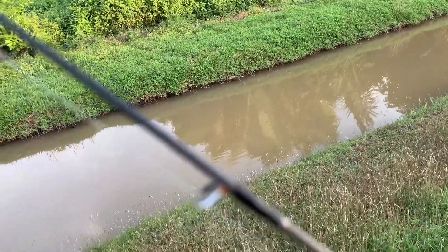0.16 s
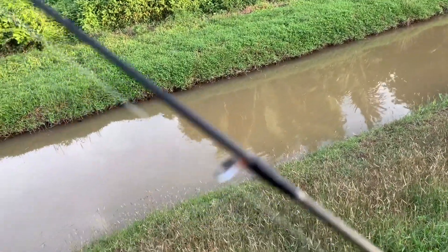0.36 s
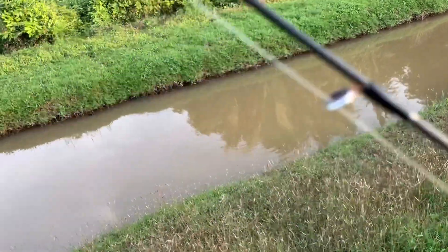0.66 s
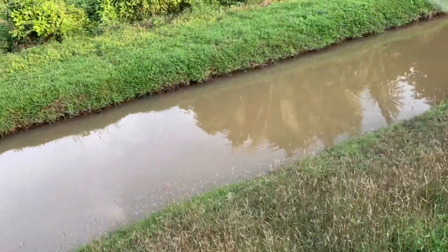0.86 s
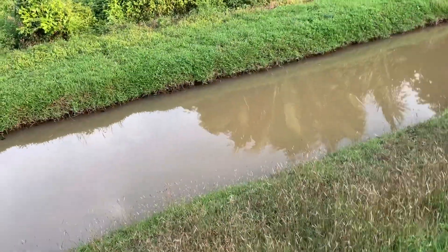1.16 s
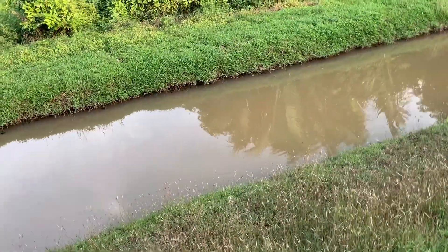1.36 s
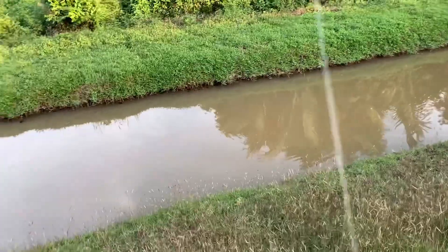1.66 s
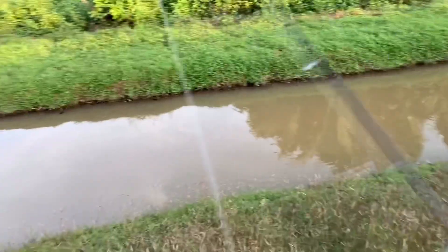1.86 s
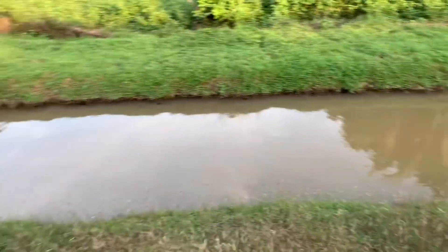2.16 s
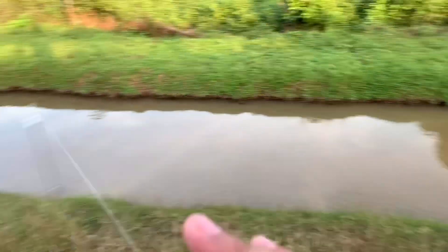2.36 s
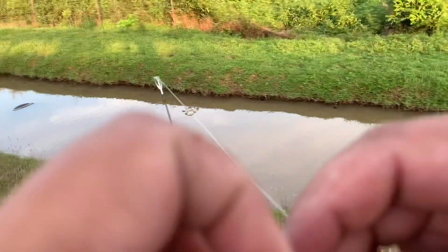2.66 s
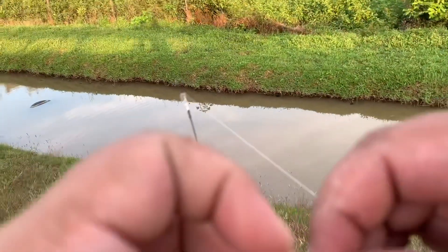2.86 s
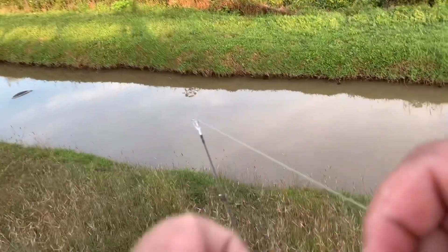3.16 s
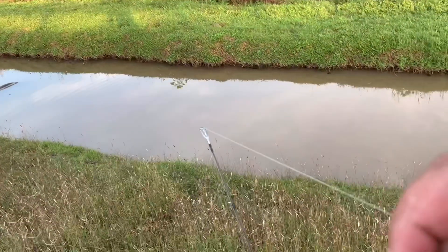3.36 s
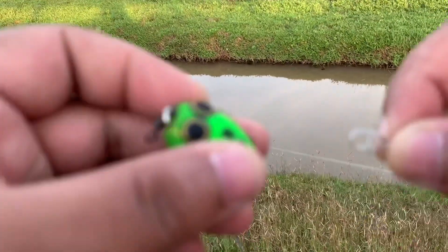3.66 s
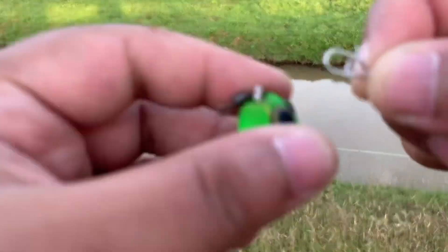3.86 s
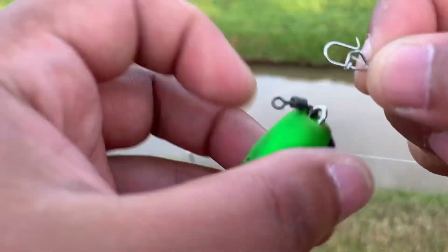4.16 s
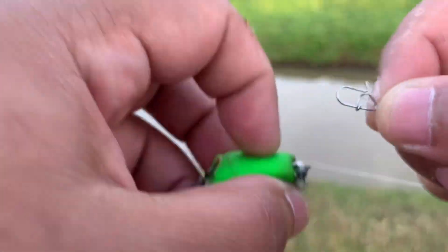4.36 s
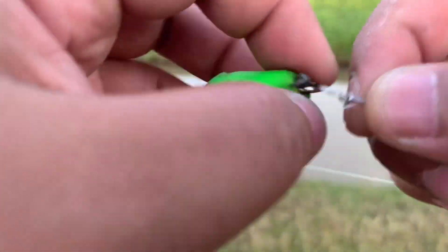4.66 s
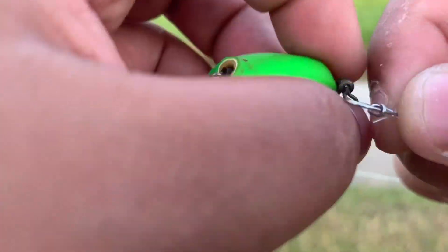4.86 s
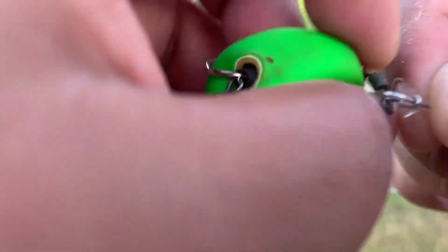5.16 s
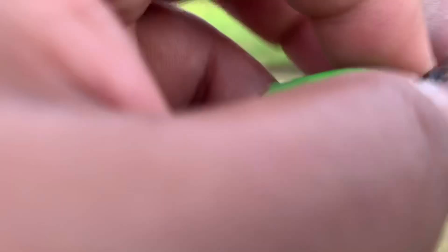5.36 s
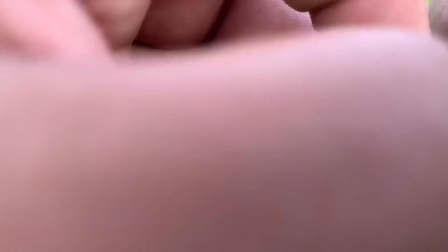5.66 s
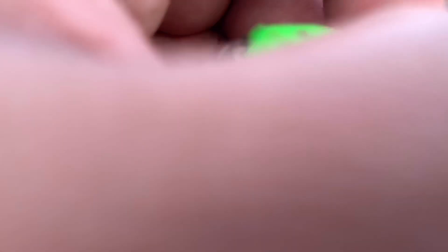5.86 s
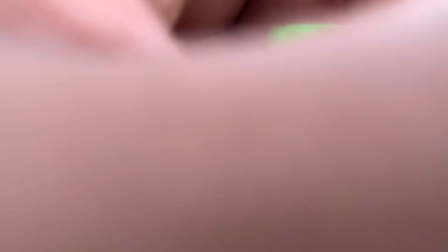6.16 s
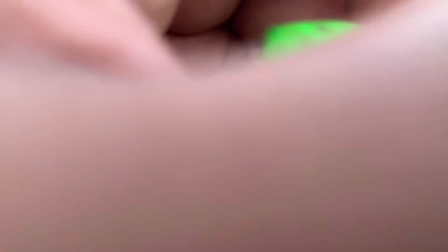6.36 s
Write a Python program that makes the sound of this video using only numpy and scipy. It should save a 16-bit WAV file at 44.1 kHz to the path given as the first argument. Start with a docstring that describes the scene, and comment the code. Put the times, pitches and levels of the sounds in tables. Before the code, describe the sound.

Open grassy canal bank beside a busy highway. Deep, continuous traffic rumble, with lorry engine drones swelling and sinking in pitch and tyre roar from both sides. Early on a tiny insect buzzes thinly, close by, for under a second. Near the middle comes one short, dead knock on a hollow plastic lure. Soft rustle and insect hiss stay underneath. Stereo outdoor pickup, no echo.

```python
"""A grassy canal bank near a highway: lorries pass, each engine note sinking as it goes by, as sums of sine tones.
Tyre roar from both directions of the road, rumble and growl are coloured noise that swells and fades.
Hands knock a plastic lure, one insect buzzes briefly, and insects hiss in the grass.
Two spaced microphones hear a source a little earlier on its own side; sound from all around differs in each."""
import sys
import numpy as np
from scipy import signal
from scipy.fft import rfft, irfft, next_fast_len
from scipy.io import wavfile
from scipy.ndimage import uniform_filter1d, map_coordinates

SR = 44100
rng = np.random.default_rng(int(sys.argv[2]) if len(sys.argv) > 2 else 0)


def wav_record(signal):
    """Record a signal, one row per channel, as 16-bit PCM in the file named by sys.argv[1]."""
    frames = np.transpose(np.atleast_2d(signal))
    bounded = np.clip(frames, -1, 1)
    # unit amplitude maps onto the largest positive 16-bit level
    quanta = np.round(bounded * 32767).astype(np.int16)
    wavfile.write(sys.argv[1], SR, quanta)


N = 286650
T = np.arange(N) / SR  # time of each sample, seconds
SOUND_M_S = 343  # speed of sound

# Noise colours below all have the columns [f/Hz, level per Hz/dB]; only their shape counts.

# passing lorries: [nearest t/s, firing rate/Hz, speed/(m/s), nearest distance/m,
# change of the rate/(Hz/s), left microphone later by/ms]
LORRIES = [(-0.11, 78.31, 34, 43.3, .71, 0.42), (1.95, 101.3, 32, 19, 0.3956, 0.4),
           (2.46, 57.98, 26.5, 15.94, 0.013, 0.21), (3.828, 58.07, 36, 27, 0.0084, 0.34),
           (4.16, 52.57, 24, 11.14, 0.027, 0.42), (6.199, 51.81, 18, 11, 0.007, 0.29),
           (0.3, 114.5, 12.4, 6.7, 0.01, 0.3)]
# swells of the engine tones: for each lorry, for each multiple of its firing rate from the first up,
# a list of [peak t/s, peak level/dB, width/s]
ENGINE_SWELLS = [
    [[(.25, -16.5, 0.73), (2.66, -28, 0.65), (3.5, -28, .3), (4.8, -26.5, 0.29), (6.3, -31, 0.2)],
     [(.2, -26, 0.21), (1.31, -22, 1.13), (4.0, -26.5, 1.4), (5.8, -28.5, 0.22)]],
    [[(.9, -21, 0.08), (1.47, -8.5, 0.45), (2.98, -19, 0.49), (3.79, -21, 0.11), (4.6, -24.5, 0.53),
     (5.8, -28, 0.56)], [(.85, -29.5, 0.073), (1.25, -27, 0.28), (2.87, -20.5, 0.33), (3.58, -20.5, 0.29),
     (4.54, -23.5, 0.87)], [(1.76, -28.5, 0.2), (3.65, -31.5, 0.54)], [(1.8, -40, 0.19), (3.3, -37.5, 0.21),
     (4.05, -37, 0.19)], [(3.7, -41.5, 0.32)]],
    [[(1.34, -26, .16), (2.64, -20.5, 0.43), (4.3, -25.5, 0.44)], [(1.4, -27, 0.85), (2.41, -15.5, 0.4)],
     [(2.28, -30, 0.31), (3.02, -27, 0.26)], [], [], [(2.35, -38, 0.063)], [], [], [(2.25, -39, 0.068)]],
    [[(3.75, -26, 0.22)], [(2.9, -22.5, 0.48), (3.55, -20.5, 0.22)], [], [], [], [], [],
     [(3.15, -41.5, 0.2)], [], [(2.7, -40, .07), (3.05, -41, .07)]],
    [[(3.79, -27.5, .57)], [(3.66, -17.5, 0.32), (4.55, -16, 0.3), (5.35, -19.5, 0.25), (6.2, -19, 0.33)],
     [(3.75, -25, 0.2), (4.6, -28, 0.28)], [(4.95, -28.5, 0.39)]],
    [[(5.8, -25, 0.45)], [(5.7, -16, 0.46), (6.4, -15.5, 0.28)], [(4.9, -25.5, 0.37), (5.75, -26, 0.2),
     (6.35, -24.5, 0.24)], [(5.54, -28.5, 0.22), (6.44, -31.5, 0.25)], [(5.95, -37, 0.24),
     (6.42, -27, 0.13)], [(5.95, -30.5, 0.1), (6.35, -26.5, 0.18)], [(5.9, -39, .15), (6.38, -30.5, 0.14)],
     [(5.7, -37, 0.09), (6.2, -31, 0.18)], [(5.95, -39.5, 0.12)], [(5.99, -44, 0.097)]],
    [[(.15, -20, 0.31)]],
]

# tyre sound along the road: [t/s, roar from right level/dB, roar from left level/dB,
# hiss from right level/dB, hiss from left level/dB]
ROAD_LEVELS = [(0.0, -25.5, -31, -37, -60), (0.65, -27, -37, -36.5, -55), (1.3, -32, -30, -37.5, -41),
               (1.95, -30, -30.5, -38.5, -44.5), (2.3, -32, -30, -41, -37), (2.85, -30, -34, -40.5, -38.5),
               (3.3, -31.5, -29, -38.5, -39.5), (3.9, -32, -30.5, -42, -40.5), (4.4, -37, -29, -46, -42),
               (4.9, -31.5, -30, -51, -41.5), (5.1, -26.5, -26.5, -44.5, -41),
               (5.85, -35.5, -25.5, -39, -43), (6.5, -27.5, -27, -42, -38)]
# colour of lorry bodies and tyres, from the right: [f/Hz, level per Hz/dB]
ROAR_RIGHT_COLOUR = [(200, -2.5), (350, -6.5), (550, -3.5), (800, 0), (1050, 3), (1350, -9), (1700, -22),
                     (2400, -25.5)]
# the same from the left: [f/Hz, level per Hz/dB]
ROAR_LEFT_COLOUR = [(200, -3), (350, -1.5), (520, -2), (800, -5.5), (1150, 0), (1500, -12.5), (2200, -33.5)]
# colour of tread on asphalt, from the right: [f/Hz, level per Hz/dB]
HISS_RIGHT_COLOUR = [(800, -6), (1300, -4), (1700, -2), (2300, -6), (3100, -9.5), (3800, -12), (5000, -21),
                     (7500, -33.5), (11000, -55)]
# the same from the left: [f/Hz, level per Hz/dB]
HISS_LEFT_COLOUR = [(800, -22), (1300, 0), (1800, -1.5), (2400, -10.5), (3000, -9.5), (3800, -16),
                    (5500, -23.5), (9000, -35)]
# brighter tyre wash of nearer cars, from the left: [peak t/s, peak level/dB before panning, width/s]
WASH_SWELLS = [(2.38, -52, 0.092), (2.8, -52, 0.17), (3.33, -44.5, 0.19), (5.75, -49, .35)]
# colour of the wash: [f/Hz, level per Hz/dB]
WASH_COLOUR = [(1400, -22), (2000, -1), (2800, 1), (3500, -6), (4300, -22)]
# colour of the far rumble: [f/Hz, level per Hz/dB]
RUMBLE_COLOUR = [(25, -32), (40, -33), (60, 4.5), (110, -3), (200, -7.5), (300, -15.5), (450, -27),
                 (700, -57), (1200, -54)]
# many far engines blended into a growl: [t/s, level/dB]
GROWL_LEVELS = [(0, -39), (.6, -39.5), (1.2, -34), (1.8, -43), (2.4, -32.5), (2.9, -32), (3.5, -35.5),
                (4.1, -38), (4.7, -40.5), (5.2, -36), (5.7, -34.5), (6.1, -29.5), (6.5, -31.5)]
# colour of the growl: [f/Hz, level per Hz/dB]
GROWL_COLOUR = [(180, -14), (250, 3.5), (350, -1), (480, -2.5), (650, -17), (850, -38)]

# blow and bounce on the plastic lure: [t/s, gain/dB]
KNOCKS = [(2.8985, -6.5), (2.9043, -19)]
# wire clip touches: [t/s, starting gain/dB]
TICKS = [(0.9124, -30), (1.004, -34), (3.4785, -29), (6.2153, -39)]

# one near insect: [t/s, upper band level/dB, lower band level/dB], before a lift of 3 dB
BUZZ_LEVELS = [(0.36, -70, -66), (0.385, -47, -55), (0.474, -52, -55), (0.522, -43, -48), (0.54, -53, -63),
               (0.6, -47, -41), (0.606, -42, -50), (0.71, -46, -44), (0.91, -44, -45), (0.948, -44, -38),
               (1.002, -50, -54), (1.04, -78, -77)]
# its upper resonances: [f/Hz, width/Hz, level/dB], levels relative to each other
WING_MODES = [(12200, 600, -14), (12700, 760, -8), (13200, 670, -8), (13750, 700, -14)]
# its lower resonances: [f/Hz, width/Hz, level/dB], levels relative to each other
BELLY_MODES = [(10500, 680, -10), (10900, 520, 0), (11500, 460, -4)]

# the grass: [t/s, rustle level/dB, crickets level/dB, high hiss level/dB]
GRASS_LEVELS = [(0.0, -50.5, -54.5, -58), (0.65, -47, -53, -53), (1.3, -53, -55.5, -58.5),
                (1.95, -48.5, -56.5, -55), (2.3, -44.5, -61, -51), (3.0, -48, -52, -50),
                (3.6, -44, -49.5, -49), (4.4, -45.5, -48.5, -52.5), (5.2, -47, -52, -55.5),
                (5.85, -47.5, -52, -56), (6.5, -47.5, -51, -55.5)]
# brief louder rustles: [t/s, rise/dB]
STIRS = [(3.21, 6.5), (3.4, 2), (4.02, 4)]
# colour of the rustle: [f/Hz, level per Hz/dB]
RUSTLE_COLOUR = [(2500, -49), (3800, 2), (5000, 4), (7000, 0.5), (9500, -3.5), (11000, -27), (13000, -69)]
# colour of the cricket band: [f/Hz, level per Hz/dB]
CRICKET_COLOUR = [(7400, -41), (8000, 8), (8600, 1), (9500, 2.5), (10500, -51)]
# colour of the high hiss: [f/Hz, level per Hz/dB]
CHORUS_COLOUR = [(8500, -36), (9800, -1), (11000, 0), (12500, -4.5), (13600, -7), (14250, -8), (14700, -30),
                 (15700, -35)]

# how the two microphones differ: [f/Hz, left over right level/dB, left later by/ms]
MICROPHONE_PAIR = [(60, 0.5, .2), (80, 0, .15), (105, -2, -0.1), (150, 0.5, -0.15), (400, -0.5, -0.061),
                   (970, -1.9, 0.02), (1800, .5, -0.0015), (4000, -0.1, 0.0042), (9000, -0.5, -0.00059)]


def amp(db):
    """Gain of a level in dB."""
    return 10 ** (np.asarray(db) / 20)


def unit(x):
    """x scaled to an average strength (rms) of 1."""
    return x / np.sqrt(np.mean(x ** 2) + 1e-20)


def curves(rows):
    """One value per sample for each column after the time."""
    times, *columns = np.transpose(rows)
    return [np.interp(T, times, column) for column in columns]


def bump(peak_s, width_s):
    """A smooth bell-shaped rise to 1 and fall."""
    return np.exp(-.5 * ((T - peak_s) / width_s) ** 2)


def swelling(rows):
    """Sum of bell-shaped swells, each with its own time, level and width."""
    return sum(amp(db) * bump(peak_s, width_s) for peak_s, db, width_s in rows)


def wobble(rate):
    """A smooth random curve, with rate random knots a second."""
    coarse = T[::64]
    knots = rng.standard_normal(int(N * rate / SR) + 4)
    return np.interp(T, coarse, map_coordinates(knots, [coarse * rate]))


def filtered(x, response):
    """x passed through a filter given as a complex response of frequency."""
    size = next_fast_len(N + 8192)
    return irfft(rfft(x, size) * response(np.fft.rfftfreq(size, 1 / SR)), size)[..., :N]


def spaced(x, lag_ms):
    """Left and right microphones, the left one lag_ms later: half the delay goes to each side."""
    sides = np.array([[1], [-1]])
    return filtered(x, lambda hz: np.exp(-1j * np.pi * hz * sides * lag_ms / 1000))


def panned(x, db):
    """Right side raised and left side lowered by db."""
    return x * amp([[-db], [db]])


def noise(colour, patchy_db, size=(7, 4)):
    """Coloured noise of rms 1 with patches of random gain, size in 21 Hz by 23 ms cells."""
    hz, _, cells = signal.stft(rng.standard_normal(N), SR, nperseg=2048)
    patches = uniform_filter1d(rng.standard_normal(cells.shape), size[0], 0)
    patches = uniform_filter1d(patches, size[1], 1)
    f, db = np.transpose(colour)
    colour_db = np.interp(np.log(hz + 1), np.log(f), db, -120, -120)
    gain = amp(colour_db[:, None] + patchy_db * unit(patches))
    return unit(signal.istft(cells * gain, nperseg=2048)[1][:N])


def around(colour, patchy_db):
    """Noise from all sides: unrelated at the two microphones."""
    return np.array([noise(colour, patchy_db), noise(colour, patchy_db)])


def engine(lorry, swells):
    """Multiples of the firing rate, raised on approach and lowered on leaving; moving air makes each waver."""
    near_s, rate_hz, speed, distance, change, lag_ms = lorry
    since = T - near_s
    leaving_m_s = speed * speed * since / np.hypot(distance, speed * since)
    heard_hz = rate_hz * (1 - leaving_m_s / SOUND_M_S) + change * since
    turn = 2 * np.pi * np.cumsum(heard_hz) / SR
    tones = np.zeros(N)
    for k, rows in enumerate(swells):
        if rows:
            waver = amp((1.1 + 0.32 * k) * wobble(7.2))  # higher tones waver more
            tones += swelling(rows) * waver * np.sin((k + 1) * (turn + 0.09 * wobble(9)))
    return spaced(np.sqrt(2) * tones, lag_ms)  # so that levels are rms


def tyres():
    """Low roar and brighter hiss from up and down the road, so early on one side or on the other."""
    roar_right_db, roar_left_db, hiss_right_db, hiss_left_db = curves(ROAD_LEVELS)
    roar_right = amp(roar_right_db) * noise(ROAR_RIGHT_COLOUR, patchy_db=3.0)
    hiss_right = amp(hiss_right_db) * noise(HISS_RIGHT_COLOUR, patchy_db=3.0)
    right = spaced(roar_right, 0.45) + spaced(hiss_right, 0.36)
    roar_left = amp(roar_left_db) * noise(ROAR_LEFT_COLOUR, patchy_db=3.0)
    hiss_left = amp(hiss_left_db) * noise(HISS_LEFT_COLOUR, patchy_db=2.0)
    left = spaced(roar_left + hiss_left, -0.49)
    return panned(right, .6) + panned(left, -.6)


def wash():
    """Brighter tyre noise of nearer cars, swelling and fading on the left."""
    return panned(spaced(swelling(WASH_SWELLS) * noise(WASH_COLOUR, patchy_db=3.5), -0.38), -1.5)


def rumble():
    """Deep far rumble: mostly from one direction, partly from all around, with a wavering level."""
    level = amp(-19 + 0.85 * wobble(3.12))
    directed = spaced(noise(RUMBLE_COLOUR, patchy_db=1.0), 0.57)
    return level * (directed + 0.32 * around(RUMBLE_COLOUR, patchy_db=3.0))


def growl():
    """Many far engines blend into noise with narrow, lasting patches."""
    blend = noise(GROWL_COLOUR, patchy_db=5.0, size=(1, 12))
    return spaced(amp(curves(GROWL_LEVELS)[0]) * blend, 0.12)


def scattered():
    """Steady road noise thrown back from ground and bushes, so it arrives from all around."""
    hiss = amp(-42) * around(HISS_RIGHT_COLOUR, patchy_db=3.5)
    roar = amp(-35.5) * around(ROAR_RIGHT_COLOUR, patchy_db=3.0)
    return hiss + roar


def knock():
    """A dead knock on hollow plastic: a short push and a quickly dying low body tone."""
    x, t = np.zeros(N + SR), np.arange(SR // 20) / SR
    push = .6 * np.exp(-.5 * ((t - .00175) / .00058) ** 2) * np.sin(2 * np.pi * 1000 * t)
    body_hz, body_db, decay_s = 520, -15, .0035
    body = amp(body_db) * np.exp(-t / decay_s) * np.sin(2 * np.pi * body_hz * t)
    for s, db in KNOCKS:
        x[round(s * SR):][:len(t)] -= amp(db) * (body + push)
    return spaced(x[:N], -.03)


def ticks():
    """Faint ticks of wire: bright noise that falls 60 dB in 4 ms."""
    x, t = np.zeros(N + SR), np.arange(SR // 20) / SR
    for s, db in TICKS:
        bright = np.diff(rng.standard_normal(len(t) + 2), 2) / 6  # differences favour the treble
        x[round(s * SR):][:len(t)] += amp(db - 60 * t / .004) * bright
    return spaced(x[:N], -.03)


def resonance(centre_hz, width_hz):
    """Response of a double resonance, with a steep end to the treble above 14300 Hz."""
    def response(hz):
        peak = hz * width_hz / (centre_hz ** 2 - hz ** 2 + 1j * hz * width_hz)
        return peak ** 2 / (1 + (hz / 14300) ** 60)
    return response


def buzz():
    """Uneven wing strokes, about 200 a second, chop a scraping noise that rings two groups of resonances."""
    stroke_count = np.floor(np.cumsum(200 * amp(2.0 * wobble(60))) / SR)
    strokes = np.diff(stroke_count, prepend=0) * amp(1.5 * rng.standard_normal(N))
    strength = filtered(strokes, lambda hz: 1 / (1 + 1j * hz / 55))  # each stroke dies away
    scrape = (0.24 * strength.mean() + strength) * rng.standard_normal(N)
    mixed = np.zeros(N)
    for level_db, modes in zip(curves(BUZZ_LEVELS), (WING_MODES, BELLY_MODES)):
        # each resonance flares on its own
        band = sum(amp(db + 2.2 * wobble(22.2)) * filtered(scrape, resonance(hz, width))
                   for hz, width, db in modes)
        mixed += amp(level_db + 3.0) * unit(band)
    sounding = (T > BUZZ_LEVELS[0][0]) & (T < BUZZ_LEVELS[-1][0])
    return spaced(sounding * mixed, 0.297)


def rustle(level_db, stir_db):
    """Dry stalks rustling all around, shaken by small movements."""
    return amp(level_db + stir_db) * around(RUSTLE_COLOUR, patchy_db=4.5)


def crickets(level_db):
    """A band of cricket noise, stronger on the right."""
    return panned(amp(level_db) * around(CRICKET_COLOUR, patchy_db=4.5), 1.5)


def chorus(level_db, stir_db):
    """A higher insect hiss, mostly from the right, whose level follows the stirring of the stalks."""
    directed = spaced(noise(CHORUS_COLOUR, patchy_db=0.5), 0.2997)
    return amp(level_db + 1.05 * stir_db) * (directed + 0.13 * around(CHORUS_COLOUR, patchy_db=1.0))


def grass():
    """Rustle, crickets and high hiss; rustle and hiss share the same small movements."""
    rustle_db, crickets_db, chorus_db = curves(GRASS_LEVELS)
    stir_db = wobble(9.7) + sum(db * bump(s, 0.016) for s, db in STIRS)
    return rustle(rustle_db, stir_db) + crickets(crickets_db) + chorus(chorus_db, stir_db)


def microphone_pair(hz):
    """Gain and delay of each microphone, half of the difference on each side."""
    f, db, ms = np.transpose(MICROPHONE_PAIR)
    halves = np.array([[.5], [-.5]])
    db = np.interp(np.log(hz + 1), np.log(f), db) * halves
    ms = np.interp(np.log(hz + 1), np.log(f), ms) * halves
    return amp(db) * np.exp(-2j * np.pi * hz * ms / 1000)


def scene():
    """All sources at the two microphones."""
    lorries = sum(engine(lorry, swells) for lorry, swells in zip(LORRIES, ENGINE_SWELLS))
    road = tyres() + wash() + rumble() + growl() + scattered()
    return lorries + road + knock() + ticks() + buzz() + grass()


def record(dry):
    """The microphones differ slightly; deep bass is cut, the loudest peaks flatten, the treble ends steeply."""
    x = filtered(dry, lambda hz: microphone_pair(hz) / np.sqrt(1 + (33 / (hz + 1)) ** 8))
    x = x / (1 + np.abs(x) ** 12) ** (1 / 12)  # rounded clipping near full scale
    return filtered(x, lambda hz: hz < 15700)


dry = scene()
out = record(dry)
wav_record(out)
```